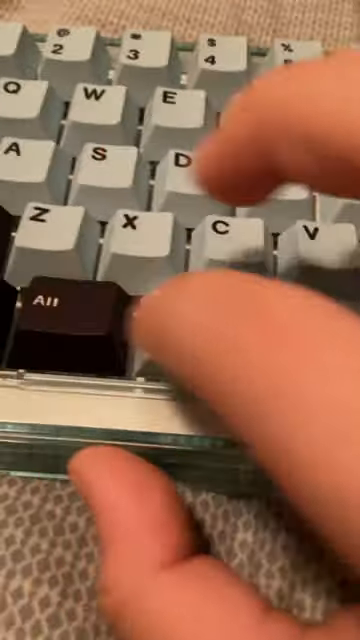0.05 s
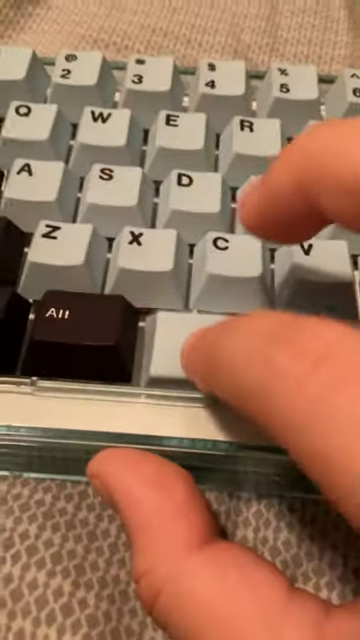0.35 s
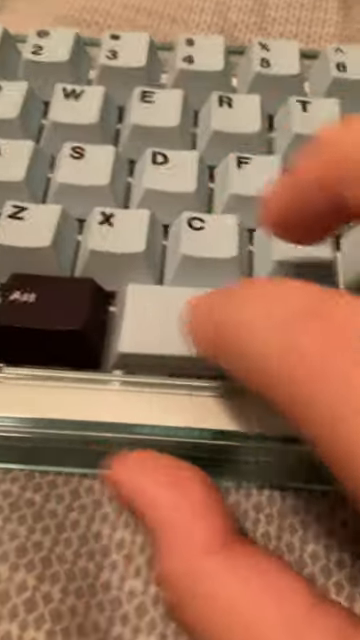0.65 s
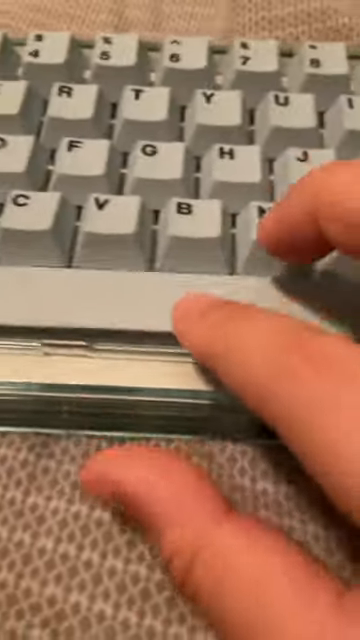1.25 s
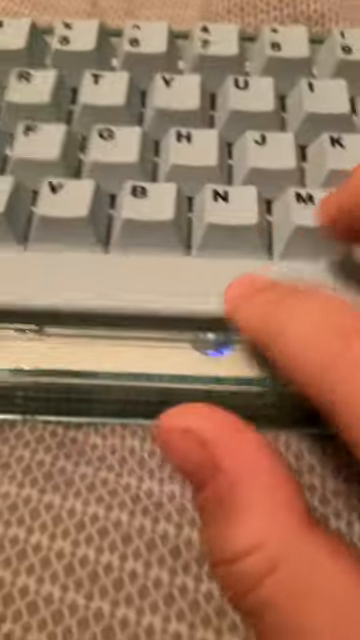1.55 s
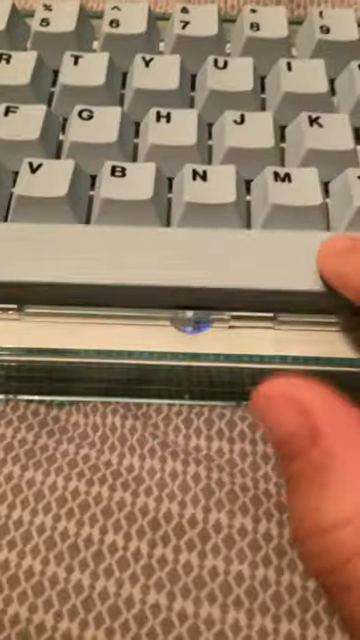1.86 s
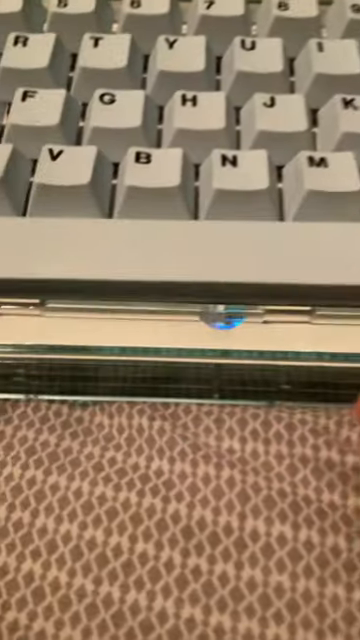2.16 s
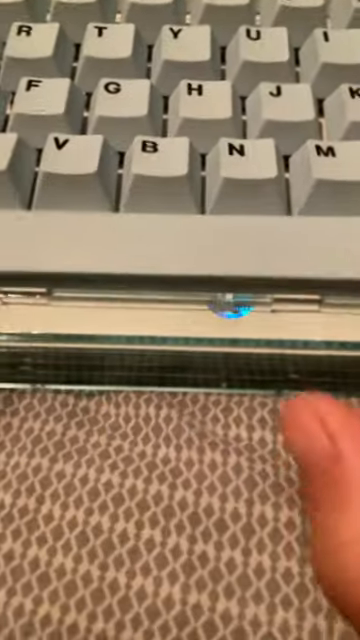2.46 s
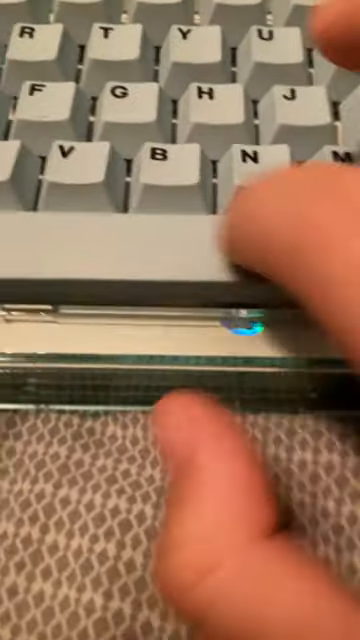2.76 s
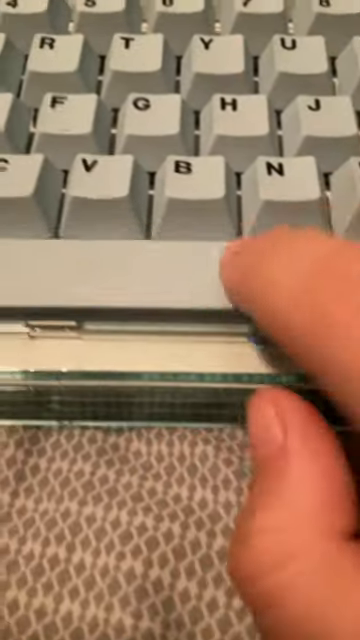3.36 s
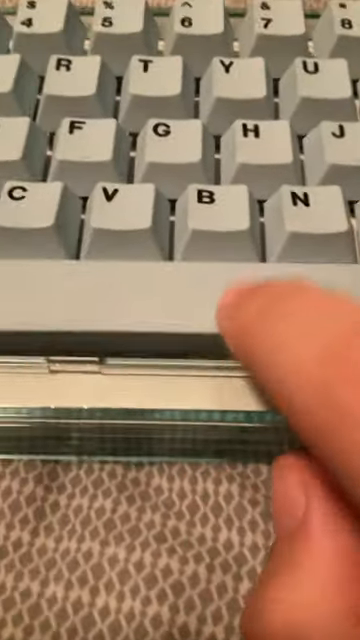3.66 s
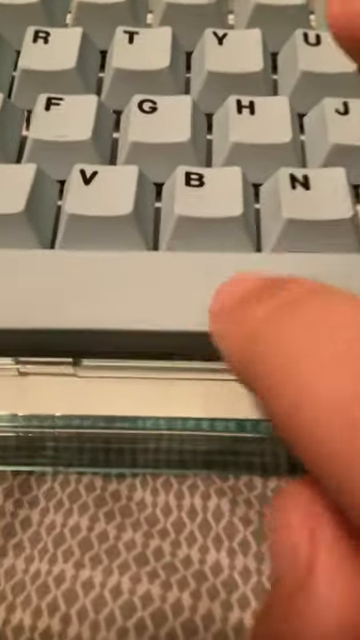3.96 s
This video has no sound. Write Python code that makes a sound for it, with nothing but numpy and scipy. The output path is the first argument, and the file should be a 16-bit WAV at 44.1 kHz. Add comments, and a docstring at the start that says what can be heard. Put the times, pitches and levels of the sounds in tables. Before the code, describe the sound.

Sharp clacks come from a finger repeatedly pressing a mechanical keyboard spacebar, close to the microphone. The taps soften midway, then pick up again, with light rattles, faint skin rubbing and the low hiss of a quiet room.

```python
"""Plastic spacebar of a mechanical keyboard, tapped by a finger, close by in a quiet room.
Each press: stem slide, bottom-out crack, short rattle of switch and stabiliser, thud of case and desk.
The bar springs back with lighter, often doubled clacks. The finger ticks, rubs and swishes on the cap.
Background: faint hiss, low room noise, hum."""
import sys
import numpy as np
from scipy import signal
from scipy.fft import rfft, irfft, next_fast_len
from scipy.io import wavfile

SR = 44100
rng = np.random.default_rng(int(sys.argv[2]) if len(sys.argv) > 2 else 0)


def waveform_to_disk(signal):
    """Save audio, clipped to [-1, 1], as 16-bit WAV at the path in sys.argv[1]."""
    frames = np.transpose(np.atleast_2d(signal))
    scaled = np.clip(frames, -1, 1) * 32767
    samples = np.round(scaled).astype(np.int16)
    wavfile.write(sys.argv[1], SR, samples)


N = 176400

# Background and rubbing envelopes: (time [s], level [dB])
HISS_ENVELOPE = [(0, -78), (.13, -76), (.2, -79), (.54, -72), (.62, -61), (.77, -63.5), (.9, -70.5),
                 (1.2, -65), (1.9, -69.5), (2.195, -80.5), (2.25, -101), (2.48, -65), (2.6, -63),
                 (2.77, -63), (2.9, -67.5), (3.55, -74), (3.82, -84), (3.88, -65), (4, -79)]
RUMBLE_ENVELOPE = [(0, -78.5), (.25, -68), (.7, -72.5), (1.2, -65), (1.9, -68), (2.2, -73.5), (2.6, -66.5),
                   (4, -66.5)]
HUM_ENVELOPE = [(0, -77.5), (.4, -72), (1.4, -71.5), (4, -72)]
RUB_ENVELOPE = [(0, -79.5), (.13, -78.5), (.19, -62.5), (.5, -70), (.55, -94), (.82, -59), (.92, -69.5),
                (1.0, -65), (1.3, -64.5), (1.48, -62.5), (1.55, -63.5), (1.94, -62), (2.0, -80),
                (2.08, -59.5), (2.16, -75.5), (2.195, -91), (2.22, -66.5), (2.34, -71), (2.42, -65),
                (2.48, -63), (2.55, -60.5), (2.85, -64.5), (3.12, -62), (3.19, -63), (3.31, -67),
                (3.38, -61.5), (3.56, -67), (3.62, -63), (3.82, -64.5), (4, -74)]
# Noise spectra: (frequency [Hz], gain [dB])
HISS_SPECTRUM = [(100, -9.5), (330, 7.5), (600, 2.5), (1000, -1.5), (2000, -6.5), (2800, 0.5), (3600, -8.5),
                 (4500, -2.5), (6500, -5), (8300, -6), (11500, -12.5), (16000, -17.5)]
RUMBLE_SPECTRUM = [(20, -30), (40, -19.5), (55, -28), (75, 6.5), (110, 5.5), (150, -2.5), (190, 10.5),
                   (230, 3), (380, 0.5), (600, -25), (1200, -32.5)]
RUB_SPECTRUM = [(60, -27), (150, -6), (370, 7.5), (440, 11), (680, -10.5), (1050, 6), (1170, 3.5),
                (1370, 7), (1750, -1.5), (2900, 1), (3650, -7), (4080, -2), (4230, 1.5), (4430, 4),
                (5100, -10), (7000, -13.5), (10000, -21), (11000, -11), (12000, -18.5), (16000, -27)]
SWISH_SPECTRUM = [(1000, -23), (3500, 2), (4400, 3), (5300, -2), (6500, 1), (8000, -9), (10000, -1.5),
                  (11200, -0.5), (12500, -8), (16000, -2.5)]
SLIDE_SPECTRUM = [(500, -12), (1300, 8), (2800, 9), (5000, -1), (7000, -4), (11000, -8), (16000, -10)]
SHUDDER_SPECTRUM = [(150, -22), (270, -1), (350, -2.5), (440, -5.5), (560, -8), (750, -22), (2000, -60)]
# Plastic contact, down (finger-damped) and up (free): (frequency [Hz], gain [dB])
DOWN_SPECTRUM = [(190, -51), (300, -29), (500, 1.5), (680, -1.5), (900, -1), (1200, -2), (2000, 5),
                 (3300, 5.5), (4800, 1.5), (5500, -0.5), (7500, -3), (10400, -6), (12500, -14),
                 (16000, -16)]
UP_SPECTRUM = [(190, -44), (330, -24), (480, -22), (560, -11), (720, -19.5), (1050, -9), (1420, 3.5),
               (1750, -5.5), (1980, 0.5), (2400, 8.5), (2950, 5), (3400, 3), (3950, 8), (4220, -9),
               (4500, 4.5), (5200, -2), (5700, -6), (7700, -10), (9000, -13.5), (10300, -13),
               (16000, -28.5)]
# Case, plate and cap modes: (frequency [Hz], down gain [dB], up gain [dB], T60 [s])
BODY_MODES = [(276.5, -22, -38, 0.078), (335.7, -16, -30, 0.066), (435.7, -26, -34.5, 0.078),
              (497, -25.5, -50, 0.064), (578, -27.5, -35.5, 0.043), (947, -32.5, -32, 0.025),
              (1147, -31, -29.5, 0.033), (1277.5, -38.5, -34.5, 0.064), (1385, -33.5, -23, .045),
              (1581, -30.5, -19, 0.013), (2180, -30.5, -33.5, 0.0067), (2904, -28, -24.5, 0.018),
              (3100, -21.5, -20, 0.006), (4170, -26.5, -22, 0.013), (4462, -30, -24, 0.032),
              (4960, -32.5, -45, 0.034), (5650, -33, -27.5, 0.0096), (7300, -49, -58, 0.014),
              (8020, -28.5, -33.5, 0.0088), (10640, -39.5, -51, 0.01)]
# Desk modes: (frequency [Hz], level re thud [dB], T60 [s])
DESK_MODES = [(73.2, -23, 0.36), (131, -29.5, 0.094), (185.4, -18.5, 0.2)]
# Five bands of a hit, low to high: thud, plate, cap, clack, snap: (frequency [Hz])
BAND_CENTRES_HZ = [380, 1150, 2350, 4200, 8000]
BAND_EDGES_HZ = [200, 700, 1700, 3200, 5500, 16000]
# Finger tick, upper four bands: (level re tick [dB])
TICK_BANDS_DB = [-2, -6, -6, -14]
# Skin brushes the cap: (centre time [s], length [s], level [dB])
SWISHES = [(0.188, 0.051, -73), (0.235, 0.019, -66), (0.395, 0.036, -63.5), (0.496, 0.019, -65),
           (0.726, 0.1, -63.5), (0.86, 0.018, -62), (1.147, 0.048, -66), (1.29, 0.031, -58),
           (1.566, 0.041, -65), (1.76, .03, -67), (1.84, 0.045, -67), (1.965, 0.025, -65),
           (2.09, 0.041, -69), (2.161, 0.021, -67), (2.218, 0.015, -62.5), (2.294, 0.034, -65),
           (2.366, 0.018, -62.5), (2.43, 0.02, -64), (2.685, 0.13, -60.5), (3.26, 0.024, -61),
           (3.34, 0.026, -65), (3.39, 0.023, -63), (3.445, 0.017, -64), (3.514, 0.02, -59),
           (3.648, 0.022, -60), (3.733, 0.027, -62), (3.775, 0.02, -60), (3.934, 0.016, -63)]
# Finger takes up the cap's play: (time [s], tick [dB], thud [dB])
TOUCHES = [(.146, -65.5, -61), (.2625, -59, -66), (.2976, -56.5, -64), (.3718, -69, -81), (.521, -68, -56),
           (.7753, -75, -65), (.938, -78, -84), (.9559, -64.5, -68), (1.1515, -77, -70),
           (1.3642, -60.5, -82), (1.7175, -61, -63), (2.025, -59.5, -91), (2.11, -65, -74),
           (2.232, -62, -65.5), (2.2952, -61, -73), (2.374, -62.5, -63), (2.4333, -63, -86),
           (2.5644, -81, -84), (2.7988, -73, -72), (2.878, -56.5, -70), (2.8881, -58, -59),
           (2.9261, -55, -70), (3.053, -63, -71), (3.1346, -60, -66), (3.3322, -59, -63),
           (3.4413, -60, -67), (3.5798, -58, -76), (3.6441, -62, -68), (3.714, -61, -72),
           (3.8468, -50, -82)]
# Bar bottoms out: (time [s], thud [dB], plate [dB], cap [dB], clack [dB], snap [dB], crack weight [0-1])
PRESSES = [(0.1839, -44.5, -49.2, -54, -61, -71, 0.62), (0.33, -39, -42.5, -38.5, -45, -47, 0.97),
           (0.7967, -35, -38, -31.5, -33, -39.5, 0.87), (0.9638, -45, -48.5, -46.1, -45.5, -53, 0.5),
           (1.1002, -39, -42.5, -39, -37.2, -46.5, 0.88), (1.2368, -39.4, -34, -34.6, -34.3, -42.5, 0.5),
           (1.3914, -42.5, -32.5, -39, -41.5, -41.8, 0.57), (1.515, -45.6, -48.5, -50, -50.0, -57.5, 0.5),
           (1.6481, -42, -31.5, -35, -36.0, -44, 0.6), (1.7798, -46.5, -49.6, -52, -54, -60.5, 0.77),
           (1.9063, -47.5, -51, -52.5, -55, -63, 0.72), (2.0369, -60, -49, -49.5, -60, -73, 0.32),
           (2.3109, -51.5, -57.5, -59, -62.5, -71.9, 0.95), (2.4463, -49.5, -53.8, -56.5, -60, -67.5, 1),
           (2.5801, -55, -45, -49, -54.1, -64.6, 0.7), (2.6924, -45.5, -35, -39.2, -43, -51, 0.68),
           (2.8218, -39.5, -43.5, -41.0, -37.5, -45.5, 1),
           (2.9515, -39.5, -43.5, -39.5, -39.5, -47.7, 0.79), (3.0794, -38.5, -43, -41.5, -45.5, -47, 0.57),
           (3.2203, -44.5, -48, -48.5, -53.5, -60, 0.7), (3.4616, -37, -41.2, -38.2, -35, -43.5, 0.44),
           (3.5965, -35.5, -39.5, -34.5, -33, -42.5, 0.84), (3.7366, -39.5, -43.5, -41, -41, -48.5, 0.4),
           (3.857, -31.5, -32.3, -31, -24, -31.5, 0.87)]
# Bar springs back or rocks: (time [s], thud [dB], plate [dB], cap [dB], clack [dB], snap [dB])
RELEASES = [(0.4274, -90, -53, -56, -56.3, -61), (0.46, -64.5, -59.5, -57, -58, -62),
            (0.5887, -67.5, -54, -57, -61.5, -70), (0.8685, -76, -53.5, -50.5, -45.5, -52),
            (0.8754, -61.5, -55.5, -61, -55, -61), (1.0199, -60, -55.5, -52, -47.5, -57.5),
            (1.1647, -79, -50.5, -50, -45.5, -54.5), (1.1713, -61, -56, -53, -58, -54),
            (1.2915, -70, -56, -53, -53, -63), (1.3067, -60.2, -52, -53, -47.5, -51),
            (2.2727, -63.5, -55.5, -56.5, -61.5, -70), (2.7557, -56.2, -57.5, -62, -57.5, -66),
            (3.0139, -59.5, -49.5, -47.5, -48.5, -56.5), (3.1482, -60, -53.5, -56.1, -55, -54.7),
            (3.2643, -82, -59.0, -55, -52.5, -67), (3.2745, -55.5, -53.5, -51.5, -49, -52.5),
            (3.3962, -65, -50.5, -55, -48.5, -58.0), (3.4017, -58.5, -50, -46, -42.5, -48.5),
            (3.5156, -70, -60.4, -57, -55.9, -67), (3.5266, -55.5, -56.8, -56.4, -58.7, -69),
            (3.6579, -52, -53.0, -48.5, -44, -49.5), (3.7748, -79, -57.2, -55.5, -52.5, -60.5),
            (3.7864, -54.5, -52, -53.6, -54, -60), (3.9293, -57, -54.9, -50, -51.4, -58.5),
            (3.9366, -55.5, -51, -60, -48, -52.7), (3.943, -52.5, -52.2, -51, -54.9, -59)]

HIT_S, LEAD_S = .25, .025


def from_db(db):
    """Decibels to gain."""
    return 10 ** (np.asarray(db) / 20)


def rms_one(x):
    """Scale to RMS 1."""
    return x / np.sqrt(np.mean(x ** 2) + 1e-20)


def envelope(points):
    """Gain per sample from (time [s], level [dB])."""
    return from_db(np.interp(np.arange(N) / SR, *np.transpose(points)))


def coloured(x, spectrum):
    """Filter by (frequency [Hz], gain [dB])."""
    hz, db = np.transpose(spectrum)
    bins_hz = np.maximum(np.fft.rfftfreq(len(x), 1 / SR), 1)
    return irfft(rfft(x) * from_db(np.interp(np.log(bins_hz), np.log(hz), db)), len(x))


def noise(spectrum, samples=N):
    """Coloured noise, RMS 1."""
    return rms_one(coloured(rng.standard_normal(samples), spectrum))


def highpass(x, hz, order=2):
    """Butterworth high-pass."""
    return signal.sosfilt(signal.butter(order, hz, "high", fs=SR, output="sos"), x)


def drift(rate_hz):
    """Random wander, RMS 1."""
    knots = rng.standard_normal(8000)
    return rms_one(np.interp(np.arange(N) / SR * rate_hz, np.arange(len(knots)), knots))


def decay(t, t60_s):
    """Exponential decay."""
    return from_db(-60 * t / t60_s)


def ringing(hz, t60_s, t):
    """Struck mode."""
    return np.sin(2 * np.pi * hz * t) * decay(t, t60_s)


def add(out, contact_s, sound):
    """Mix in a sound, starting LEAD_S before contact."""
    start = max(int((contact_s - LEAD_S) * SR), 0)
    part = out[start:start + len(sound)]
    part += sound[:len(part)]


def background(hum_hz=154.2, hum_waver_db=2, hiss_waver_db=1.5):
    """Swelling and sinking hiss, low room noise, wavering hum."""
    hiss = noise(HISS_SPECTRUM) * envelope(HISS_ENVELOPE) * from_db(hiss_waver_db * drift(25))
    rumble = noise(RUMBLE_SPECTRUM) * envelope(RUMBLE_ENVELOPE)
    phase_rad = 2 * np.pi * hum_hz * np.arange(N) / SR + .4 * drift(24)
    hum = np.sqrt(2) * np.sin(phase_rad) * envelope(HUM_ENVELOPE) * from_db(hum_waver_db * drift(16))
    return hiss + rumble + hum


def swishes():
    """Skin brushes the smooth cap: bright noise in Gaussian swells."""
    t = np.arange(N) / SR
    gain = sum(from_db(db) * np.exp(-2 * ((t - centre_s) / length_s) ** 2)
               for centre_s, length_s, db in SWISHES)
    return gain * noise(SWISH_SPECTRUM)


def rubbing(grain_db=1.2, waver_db=3):
    """Skin sticks and slips: grainy friction through plate and cap resonances."""
    roughness_db = grain_db * drift(rate_hz=400) + waver_db * drift(rate_hz=35)
    friction = rng.standard_normal(N) * from_db(roughness_db)
    return rms_one(coloured(friction, RUB_SPECTRUM)) * envelope(RUB_ENVELOPE)


def plastic_contact(t, crack_weight, down, rattle_t60_s=.023, treble_t60_s=.016):
    """Crack, rattle of loose plastic (treble dies first), trace of room."""
    crack_weight = np.clip(crack_weight, .02, .95)
    white = rng.standard_normal(len(t))
    dull = signal.sosfiltfilt(signal.butter(2, 6500, fs=SR, output="sos"), white, padtype=None)
    rattle = dull * decay(t, rattle_t60_s) + (white - dull) * decay(t, treble_t60_s)
    rattle *= np.sqrt(1 - crack_weight) * from_db(6 if down else 2) / np.linalg.norm(rattle)
    impulse = np.sqrt(crack_weight) * from_db(2) * (t == 0)
    crack = signal.lfilter(*signal.butter(1, 7000, fs=SR), impulse)
    room = from_db(-54.5) * rng.standard_normal(len(t)) * decay(t, t60_s=.32)
    return rattle - crack + room


def body_ring(t, down, spread_db=1.5, detune=.005):
    """Case, plate and cap ring; mode gain and pitch vary per hit."""
    body = 0
    for k, (hz, down_db, up_db, t60_s) in enumerate(BODY_MODES):
        gain = from_db((down_db if down else up_db) + spread_db * rng.standard_normal())
        detuned_hz = hz * (1 + detune * rng.standard_normal())
        body += (-1) ** k * gain * ringing(detuned_hz, t60_s, t)
    return body


def set_bands(hit, bands_db, window_s=.025):
    """Equalise to band levels (energy / window_s), which stand for finger place and force."""
    hz = np.fft.rfftfreq(len(hit), 1 / SR)
    bands = [(hz >= lo) & (hz < hi) for lo, hi in zip(BAND_EDGES_HZ, BAND_EDGES_HZ[1:])]
    for _ in range(3):
        power = 2 * np.abs(rfft(hit)) ** 2 / (len(hit) * window_s * SR)
        now_db = [10 * np.log10(power[band].sum()) for band in bands]
        hit = coloured(hit, list(zip(BAND_CENTRES_HZ, np.subtract(bands_db, now_db))))
    return hit


def key_hit(bands_db, crack_weight, down):
    """One impact: plastic contact plus ringing body."""
    t = np.arange(int(HIT_S * SR)) / SR
    lead = (int(LEAD_S * SR), 0)
    contact = np.pad(plastic_contact(t, crack_weight, down), lead)
    contact = coloured(contact, DOWN_SPECTRUM if down else UP_SPECTRUM)
    hit = highpass(contact + np.pad(body_ring(t, down), lead), hz=250)
    hit = np.pad(hit, (0, next_fast_len(len(hit)) - len(hit)))
    return set_bands(hit, bands_db)


def finger_ticks(shifts_per_s=7, start_s=.15, shift_db=-65, spread_db=2, shift_thud_db=-71):
    """Light touches, plus random ticks as the finger shifts; the loose bar rings as on its way up."""
    out = np.zeros(N)
    times_s = np.flatnonzero(rng.random(N) < shifts_per_s / SR) / SR
    shifts = [(time_s, shift_db + spread_db * rng.standard_normal(), shift_thud_db)
              for time_s in times_s[times_s > start_s]]
    for time_s, tick_db, thud_db in list(TOUCHES) + shifts:
        bands_db = [thud_db, *(tick_db + np.array(TICK_BANDS_DB))]
        add(out, time_s, key_hit(bands_db, crack_weight=.068, down=False))
    return out


def stem_slide(t, clack_db, slide_s=.02, re_clack_db=-17.5):
    """Stem hisses down its housing until the bar lands at t = 0."""
    gate = np.clip(2 * (1 + t / slide_s), 0, 1) * (t < 0)
    return from_db(clack_db + re_clack_db) * gate * noise(SLIDE_SPECTRUM, len(t))


def desk_and_case(t, thud_db, shudder_db=-11.5, rise_s=.025):
    """Desk takes the blow at t = 0; the case shudders on."""
    after_s = np.maximum(t, 0)
    desk = sum(from_db(db) * ringing(hz, t60_s, after_s) for hz, db, t60_s in DESK_MODES)
    shudder_gain = from_db(shudder_db) * np.minimum(after_s / rise_s, 1) * decay(after_s, t60_s=.21)
    shudder = shudder_gain * noise(SHUDDER_SPECTRUM, len(t))
    return from_db(thud_db) * (highpass(desk, hz=50) + shudder)


def spacebar():
    """Bar bottoms out, then springs back or rocks on its stabiliser."""
    out = np.zeros(N)
    t = np.arange(int(HIT_S * SR)) / SR - LEAD_S
    for time_s, *bands_db, crack_weight in PRESSES:
        add(out, time_s, key_hit(bands_db, crack_weight, down=True))
        add(out, time_s, stem_slide(t, clack_db=bands_db[3]))
        add(out, time_s, desk_and_case(t, thud_db=bands_db[0]))
    for time_s, *bands_db in RELEASES:
        add(out, time_s, key_hit(bands_db, crack_weight=.11, down=False))
    return out


def scene():
    """Keyboard and room, mono."""
    return (background() + spacebar() + finger_ticks() + rubbing() + swishes())[None]


def record(dry):
    """Deep bass rolled off, steep cut at 16 kHz."""
    lowpass = signal.ellip(10, .2, 80, 16000, fs=SR, output="sos")
    return signal.sosfilt(lowpass, highpass(dry, hz=42, order=3))


dry = scene()
out = record(dry)
waveform_to_disk(out)
```